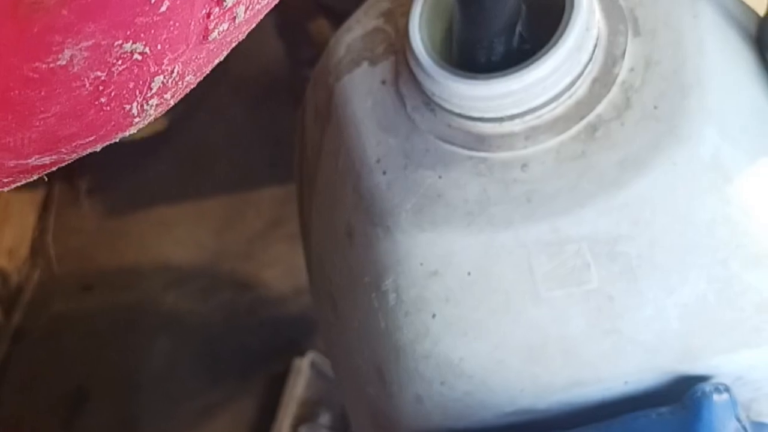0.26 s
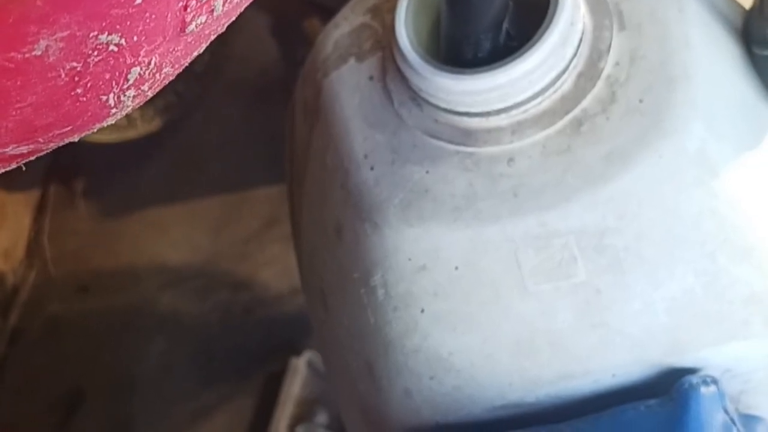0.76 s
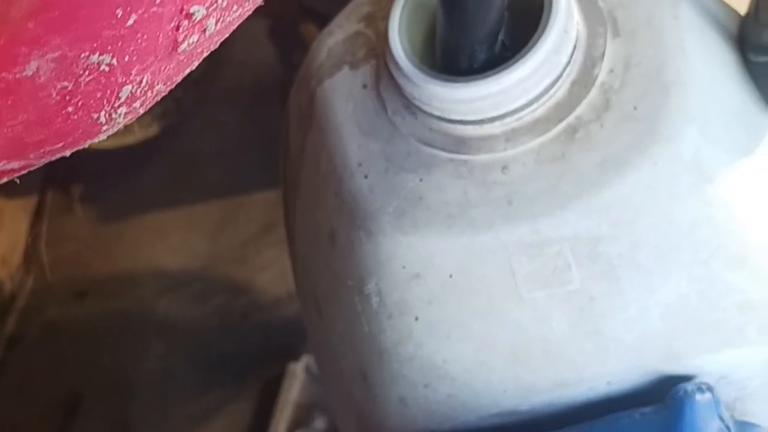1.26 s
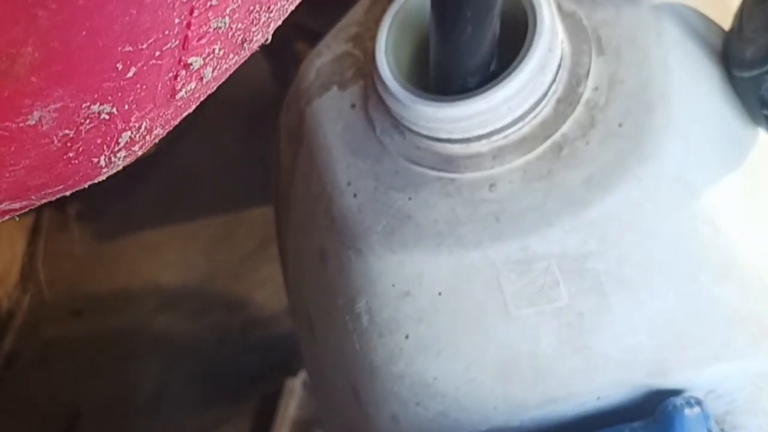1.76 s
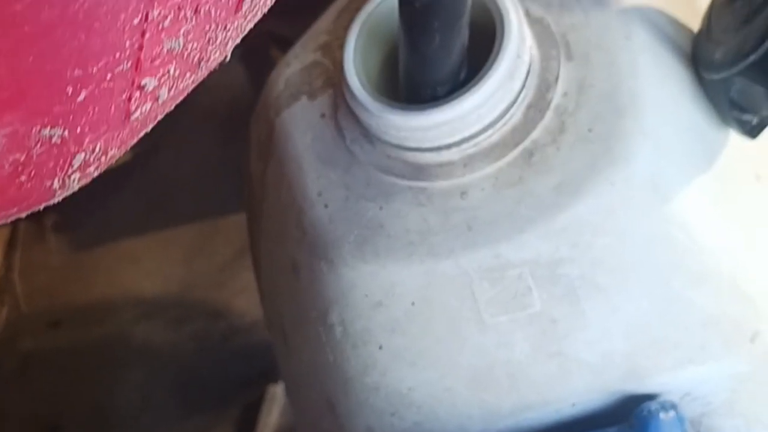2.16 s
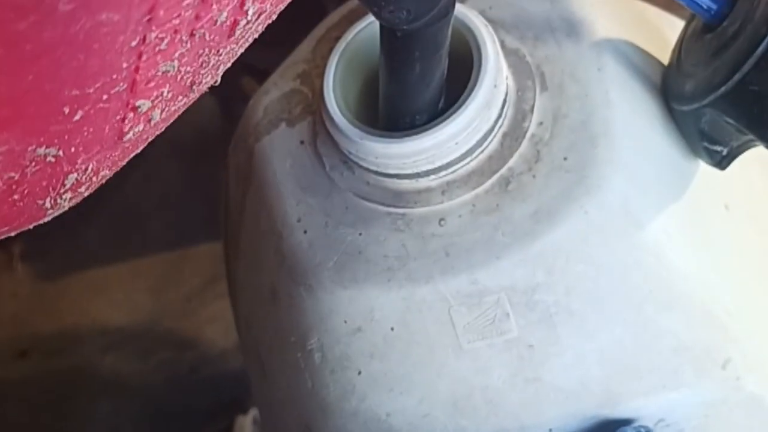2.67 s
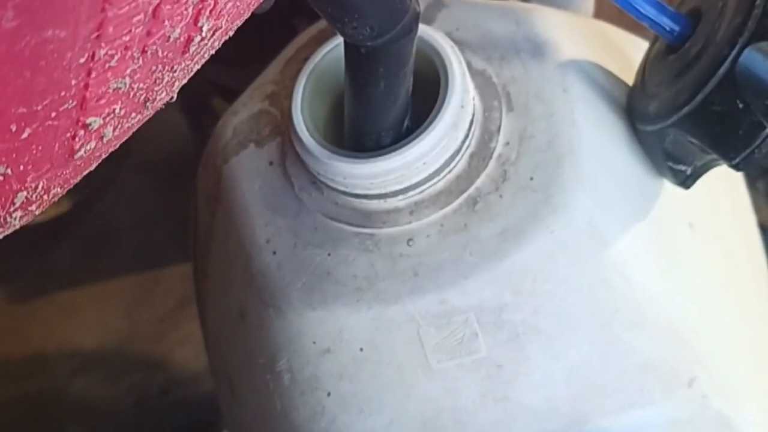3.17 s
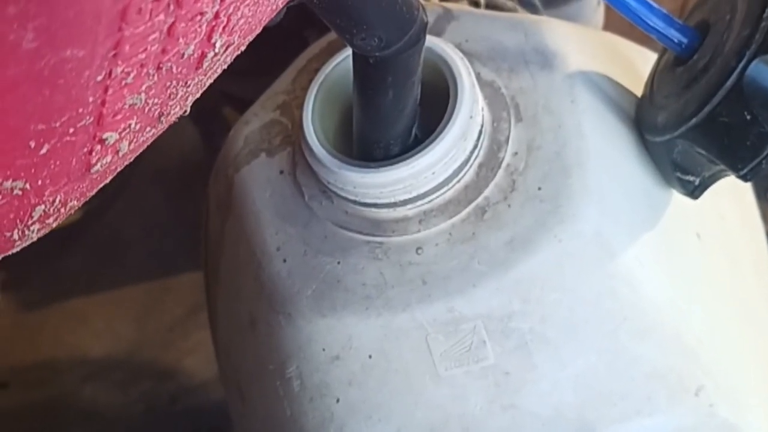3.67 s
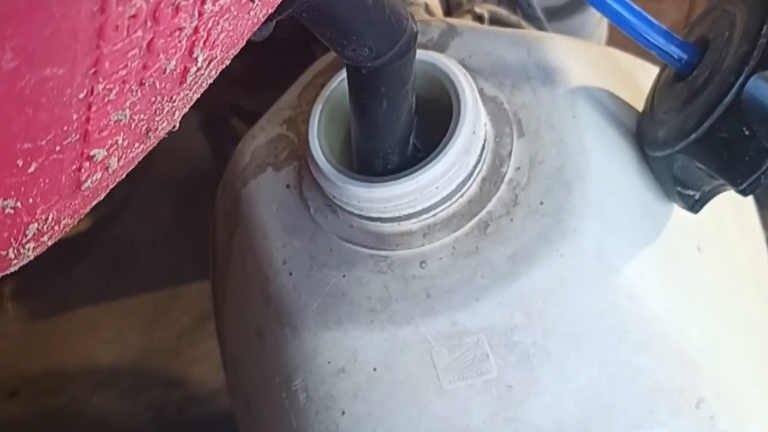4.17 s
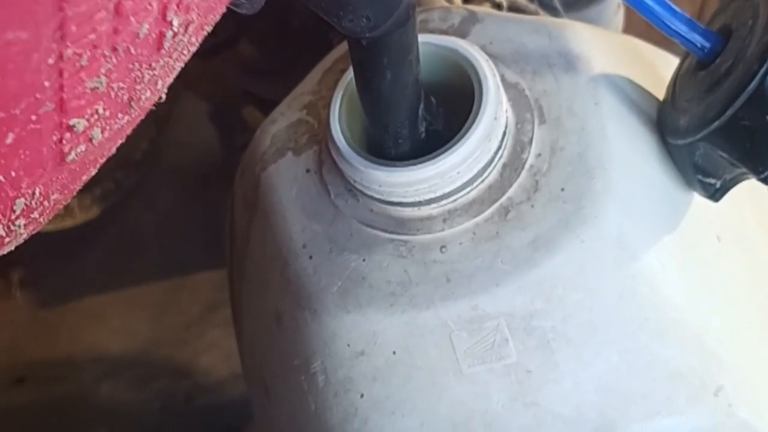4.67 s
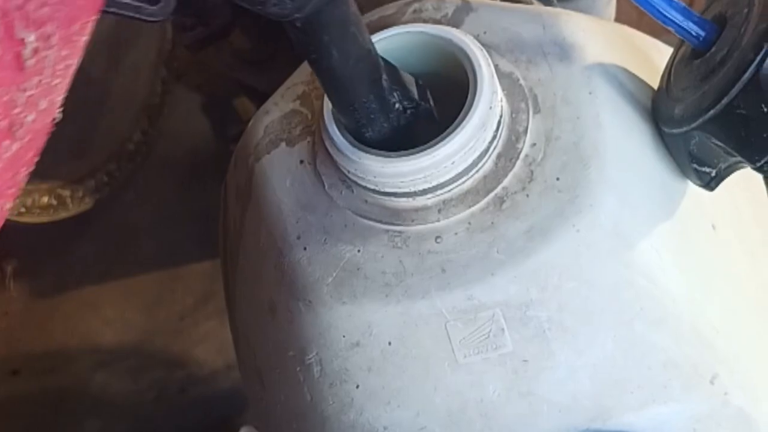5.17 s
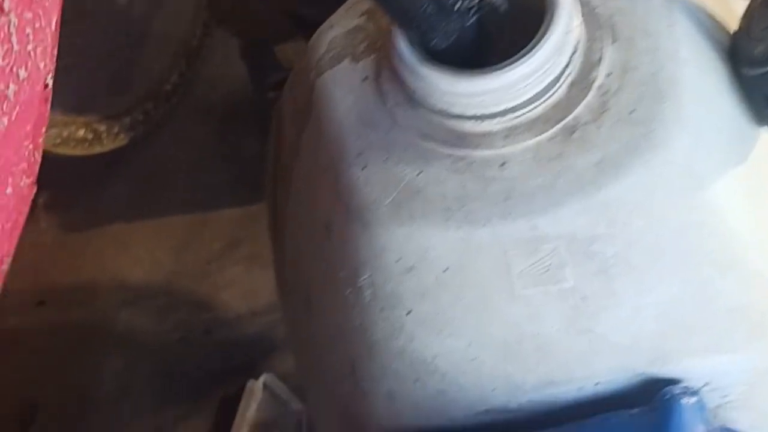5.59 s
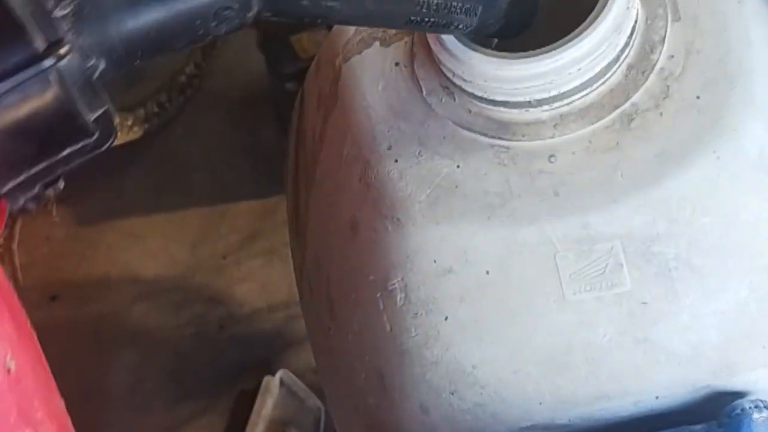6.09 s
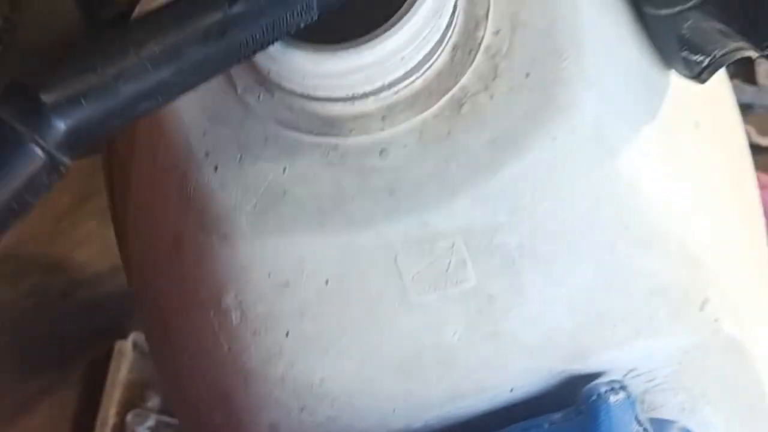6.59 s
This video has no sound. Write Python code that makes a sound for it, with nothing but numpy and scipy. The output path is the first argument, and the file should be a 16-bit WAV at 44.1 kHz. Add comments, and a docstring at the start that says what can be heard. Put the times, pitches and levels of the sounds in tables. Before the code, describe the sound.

Close bubbly pouring into a plastic fuel tank with plops and low gurgle, dying to drips, a scraping slide and soft microphone bumps.

```python
"""In a workshop, fuel runs from a plastic can's spout into a plastic motorcycle tank. Swarms of damped tones
make a fizz of tiny bubbles, plops and a gurgle, which ring in the hollow tank. The spout goes deeper into
the neck and the stream thins to drips; then the spout slides out with filtered noise and gliding squeaks.
A hand bumps the microphone's case with dull bursts of noise; wavering tones hum low behind it all."""
import sys
import numpy as np
from scipy import signal
from scipy.fft import rfft, irfft, next_fast_len
from scipy.io import wavfile
from scipy.ndimage import uniform_filter1d

SR = 44100
rng = np.random.default_rng(int(sys.argv[2]) if len(sys.argv) > 2 else 0)


def dump_mix(stems):
    """Bounce the given channels to the path in sys.argv[1] as a 16-bit WAV at rate SR."""
    frames = np.atleast_2d(stems).T  # one column per channel
    limited = np.clip(frames, -1, 1)  # hard clip at full scale
    pcm = np.round(limited * 32767).astype(np.int16)
    wavfile.write(sys.argv[1], SR, pcm)


N = 301637
T = np.arange(N) / SR
HZ = np.fft.rfftfreq(N, 1 / SR)

# tone colour of the finest bubbles: f/Hz, level/dB
FIZZ_COLOUR = [(1590, -2.5), (2700, -1.5), (3180, 0.5), (3720, 0.5), (5040, 0), (6350, 0.2), (7550, -3.5),
               (8300, -5.5), (9070, -7.5), (10800, -4), (12100, 1.8), (13500, 2.5), (15100, 4),
               (15900, -1.5)]
# how hard the jet plunges into the pool, less as the spout goes deeper: t/s, level/dB
PLUNGE_LEVEL = [(0, -4), (.7, -2), (1.18, 1), (1.65, -3), (2.15, -8.5), (3.65, -5.5), (3.92, -13.5),
                (4.44, -12), (4.72, -29), (5.05, -33), (5.25, -44)]
# the largest bubbles, plus one soft knock at 5.597 s voiced the same way: t/s, relative level/dB, pitch f/Hz
LARGE_BUBBLES = [(0.093, -26, 1290), (0.4657, -33, 1480), (0.847, -31, 1490), (0.8974, -30, 2060),
                 (0.9866, -28, 1830), (1.043, -22.5, 1630), (1.1558, -39, 1390), (1.2466, -22, 2120),
                 (1.286, -23, 1410), (1.734, -30, 1280), (1.8215, -30.5, 1080), (1.9404, -33, 1840),
                 (1.9874, -23.5, 1880), (2.3088, -27, 1700), (2.7033, -24, 1560), (2.7541, -28, 1250),
                 (2.8574, -42, 1550), (2.9213, -37, 1970), (3.0073, -24.5, 1560), (3.0935, -30, 1650),
                 (3.1872, -36, 1590), (3.3142, -20.5, 1590), (3.364, -20, 2370), (3.6074, -23.5, 1610),
                 (3.6656, -28, 2000), (3.7364, -44, 2020), (4.0948, -24.5, 2220), (4.214, -29, 1840),
                 (4.3134, -26, 1840), (4.6139, -31, 1850), (4.9, -31, 1430), (4.9641, -27, 1890),
                 (4.983, -37, 1400), (5.054, -35.5, 1370), (5.085, -37, 2200), (5.125, -35, 1130),
                 (5.2016, -38.5, 1500), (5.272, -45, 1500), (5.287, -39, 3300), (5.366, -46, 1110),
                 (5.447, -49, 1410), (5.52, -48.5, 1010), (5.597, -45, 1110)]


def amp(db):
    """Turns decibels into a gain."""
    return 10 ** (np.asarray(db) / 20)


def unit(x):
    """Scales a sound so that the mean of its channels has rms 1."""
    middle = np.atleast_2d(x).mean(0)
    return x / np.sqrt(np.mean(middle ** 2) + 1e-20)


def curve(rows):
    """Joins (time, value) rows by straight lines, giving a value at every sample."""
    return np.interp(T, *np.transpose(rows))


def swell(start, length, edge):
    """A gain that rises over edge seconds, holds from start for length seconds, and dies away alike."""
    outside = np.maximum(np.maximum(start - T, T - start - length), 0)
    return np.exp(-(outside / edge) ** 2)


def shape(points):
    """Gain at every frequency from (Hz, dB) points."""
    f, db = np.transpose(points)
    return amp(np.interp(np.log(HZ + 1), np.log(f + 1), db))


def colour(x, gain):
    """Filters a sound by a gain given at every frequency."""
    size = next_fast_len(N + 4096)
    gain = np.interp(np.fft.rfftfreq(size, 1 / SR), HZ, gain)
    return irfft(rfft(x, size) * gain, size)[..., :N]


def wander(rate):
    """A random curve of rms 1 that takes a new direction rate times a second."""
    knots = rng.standard_normal(4096)
    return unit(np.interp(T * rate, np.arange(len(knots)), knots))


def add(mix, s, sound):
    """Mixes a sound in at time s."""
    part = mix[max(round(s * SR), 0):][:len(sound)]
    part += sound[:len(part)]


def resonate(x, hz, width):
    """A resonance of gain 1 that may follow a pitch curve."""
    # shift the pitch down to 0 Hz, smooth there, and shift back
    turn = np.exp(2j * np.pi * np.cumsum(hz * np.ones(N)) / SR)
    r = np.exp(-np.pi * abs(width) / SR)
    return 2 * (turn * signal.lfilter([1 - r], [1, -r], x / turn)).real


def bubble(hz, cycles, rise):
    """A damped ring with a soft start; its pitch climbs as the bubble nears the surface."""
    u = np.arange(0, 5, hz / cycles / SR)  # time, counted in decay times
    ring = np.sin(2 * np.pi * cycles * (u + rise * u ** 2 / 2))
    return (1 - np.exp(-u / 0.097)) * np.exp(-u) * ring


def swarm(lo_hz, hi_hz, per_s, spread_db, cycles, rise, pitches=36):
    """Many bubbles at random moments and of random strength, on evenly spaced pitches."""
    out = np.zeros(N)
    for hz in np.linspace(lo_hz, hi_hz, pitches):
        when, luck, keep = rng.random((1500, 3)).T
        kept = keep < per_s * T[-1] / pitches / len(keep)
        strength = amp(spread_db * np.minimum(-np.log(luck + 1e-9), 4.5)) * kept
        starts = np.bincount((when * N).astype(int), strength, N)
        ring = bubble(hz, cycles, rise)
        out += signal.oaconvolve(starts, ring / np.linalg.norm(ring))[:N]
    return out


def cavity(x, t60, direct, late=6, patterns=5, smooth=60):
    """Sound leaves the neck directly, late samples later at the right port, then as dense wall echoes.
    The echoes keep changing as the surface heaves, so several patterns take turns."""
    t, out = T[:6144], np.zeros((2, N))
    heave = T * 13 + .6 * wander(rate=3)
    for k in range(patterns):
        response = rng.standard_normal((2, len(t))) * amp(-60 * t / t60)
        response /= np.linalg.norm(response, axis=1, keepdims=True)
        response[0, 0] += direct
        response[1, late] += direct
        # the echoes ripple the spectrum finely but leave its broad outline even
        z = rfft(response, 2 * len(t))
        outline = np.sqrt(uniform_filter1d(abs(z) ** 2, size=smooth, axis=1))
        response = irfft(z / outline)[:, :len(t)]
        share = np.sin(np.pi / 2 * np.minimum((heave - k) % patterns, 2))
        out += signal.oaconvolve((x * share)[None], response, axes=1)[:, :N]
    return out


def stream():
    """The jet breaks into fizz and drags air under: small bubbles tinkle, large ones gurgle."""
    # the flow is steady until the can is tipped back, then chokes and dribbles: t/s, level/dB
    flow_db = curve([(0, 1), (4.68, 1), (4.70, -5), (4.715, 1), (5.145, -0.5), (5.165, -5), (5.205, -6.5),
                     (5.225, -9), (5.255, -7), (5.29, -3.5), (5.315, -7.5), (5.342, -2), (5.365, -8),
                     (5.4, -15), (5.48, -11), (5.55, -26), (5.585, -9.5), (5.8, -20)])
    open_neck = np.interp(T, [2.1, 2.5], [1, 0])  # until the spout fills the neck
    running = np.interp(T, [5.6, 5.95], [1, 0])
    fizz = fine_fizz(flow_db)
    # with the neck open, the top of the fizz leans to the left port
    beam = colour(fizz, shape([(7500, -11.5), (8800, 0.0), (12500, 0.5), (14000, -9)])) * open_neck
    # and the gap around the spout rings in one broad band
    gap = colour(fizz[0], shape([(3000, -12.5), (3650, 0.0), (4200, -4.0), (4900, -46)])) * open_neck
    # the level dips briefly around each of the largest bubbles, most for the strongest
    loudest_db = max(db for s, db, hz in LARGE_BUBBLES)
    dips = [amp(db - loudest_db) * swell(s, 0.026, edge=0.033) for s, db, hz in LARGE_BUBBLES]
    dip_db = -2.5 * np.max(dips, axis=0)
    pour = fizz + beam * np.array([[.35], [-.45]]) + gap * np.array([[.15], [.7]])
    return running * (pour + small_bubbles(flow_db + dip_db) + gurgle(0.1 * dip_db))


def fine_fizz(flow_db):
    """The jet breaks up into tiny, high, quickly damped bubbles that come in spurts."""
    spurts = wander(rate=46)
    spray = swarm(2940, 13350, per_s=3800, spread_db=2.5, cycles=0.74, rise=0.065)
    spray = cavity(spray * amp(.7 * spurts), t60=.045, direct=.45, patterns=8, smooth=16)
    return unit(colour(spray, shape(FIZZ_COLOUR))) * amp(-55 + flow_db)


def small_bubbles(change_db):
    """Air dragged under in gulps tinkles as small ringing bubbles."""
    # tone colour: f/Hz, level/dB
    bubbling_colour = [(500, 6.5), (850, -1), (1060, -4), (1300, 2.5), (1650, 0), (1900, 2), (2250, -2.5),
                       (2800, 2), (3640, -19), (6160, -120)]
    # level before the given change: t/s, level/dB
    bubbling_level = [(0, -64), (.75, -65), (1.0, -58), (1.35, -60), (1.85, -60.5), (2.2, -65.5),
                      (2.75, -61), (3.15, -63), (3.7, -60), (3.92, -65), (4.45, -59.5), (4.75, -68.5),
                      (5.13, -72.5), (5.19, -73)]
    small = swarm(700, 3100, per_s=1300, spread_db=2.8, cycles=2.2, rise=.04)
    small = cavity(small * gulps(), t60=.05, direct=.6, smooth=30)
    return unit(colour(small, shape(bubbling_colour))) * amp(curve(bubbling_level) + change_db)


def gulps():
    """Air goes under in gulps: a gain of rms 1 that leaps at random moments and sinks back."""
    per_s, fade_s, depth = 60, .010, .35
    when, size = rng.random((2, N))
    leaps = 2 * size * (when < per_s / SR)
    rush = signal.lfilter([1], [1, -np.exp(-1 / (fade_s * SR))], leaps)
    return unit(1 - depth + depth * np.sqrt(rush))


def gurgle(change_db):
    """Large, low bubbles gurgle more strongly the harder the jet plunges."""
    # tone colour: f/Hz, level/dB
    gurgle_colour = [(82, -31), (140, -14), (166, -7.5), (254, -3.5), (307, -6), (430, 2), (476, -2),
                     (547, 0), (607, -0.5), (690, 2.5), (835, -5.5), (910, -10.5), (1100, -3.5),
                     (1430, -47), (2420, -120)]
    large = swarm(205.5, 952, per_s=1100, spread_db=1.5, cycles=1.35, rise=0.016)
    low = cavity(large, t60=0.11, direct=0.24)
    # long waves reach both ports alike
    low = low + colour(low[::-1], shape([(250, 0.5), (430, -8.0), (560, -28), (700, -59)]))
    return unit(colour(low, shape(gurgle_colour))) * amp(-51.5 + curve(PLUNGE_LEVEL) + change_db)


def drips():
    """Big bubbles plop; drops splash on the wall and neck and trap a tiny ringing bubble."""
    # drops at set times: t/s, relative level/dB, ring f/Hz, share of ring against splash (0-1)
    set_drops = [(0.2947, -40, 13100, 0.6), (0.6413, -35.5, 6200, 0.4), (0.7916, -45, 4330, 0.6),
                 (1.254, -35.5, 6450, 0.54), (1.3024, -40, 14200, 0.9), (1.5534, -38, 13500, 0.7),
                 (2.279, -35.5, 4310, 0.5), (2.561, -39, 12500, 0.9), (2.835, -33.5, 6600, 0.57),
                 (2.9198, -44, 6130, 0.7), (3.3867, -38, 13000, 0.4), (3.716, -44, 6420, 0.43),
                 (4.1026, -42, 14700, 0.8), (4.36, -36.5, 6200, 0.4), (4.4844, -32, 13300, 0.5),
                 (4.569, -40.5, 5570, 0.8), (4.713, -38, 13500, 0.1), (4.8005, -40, 13300, 0.4),
                 (4.8516, -35, 13200, 0.6), (5.1114, -35.5, 6940, 0.53), (5.1336, -37.5, 14540, 0.3),
                 (5.217, -35.5, 5260, 0.42), (5.4228, -54, 6200, 0.8), (5.445, -45.5, 7450, 1),
                 (5.472, -45, 7600, 0.6), (5.5607, -47, 14560, 0.25), (5.624, -46, 13000, 0.2),
                 (5.658, -48, 5200, 0.34), (5.701, -50.5, 5660, 1), (5.7366, -48.5, 14200, 0.3),
                 (5.783, -51, 9000, 0.3), (5.8074, -49, 12800, .5), (5.8356, -44.5, 12800, 0.34)]
    plops, drops, t = np.zeros(N), np.zeros(N), T[:2000]
    for s, db, hz in LARGE_BUBBLES:
        add(plops, s, amp(db) * plop(hz))
    for s, db, hz, ring in set_drops + spatter():
        splash = (1 - ring) * rng.standard_normal(len(t)) * np.exp(-t / 0.0038) * 0.75
        add(drops, s, amp(db) * splash)
        add(drops, s, amp(db) * 3 * ring * bubble(hz, cycles=3.0, rise=0.0083))
    drops = colour(drops, shape([(1200, -70), (4500, -1.5), (7000, -4.0), (9500, -4.5), (13000, 2.0)]))
    plops = cavity(plops, t60=.06, direct=.6)
    drops = cavity(drops, t60=.065, direct=.33)
    return amp(-12.5) * plops + amp(4.4) * drops


def plop(hz):
    """A large bubble rings and sheds six smaller, quieter ones just after, pitched around it."""
    out = np.zeros(2000)
    add(out, 0, bubble(hz, cycles=2, rise=.02))
    for delay, pitch in rng.random((6, 2)):
        shed_hz = hz * 2 ** (1.6 * pitch - .8)
        add(out, .014 * delay, .45 * bubble(shed_hz, cycles=1.3, rise=.03))
    return out


def spatter():
    """More drops, all of one middling level, fall at random while the fuel runs."""
    end_s, per_s, relative_db, ring_share = 5.1, 1.9, -40.5, .4
    # each row: t/s, relative level/dB, ring f/Hz, share of ring (0-1)
    return [(when * end_s, relative_db, np.interp(pitch, [0, 1], (5000, 14700)), ring_share)
            for when, pitch, keep in rng.random((64, 3)) if keep < per_s * end_s / 64]


def headspace(x):
    """Standing waves above the pool lift some notes and hollow out others, wavering as the surface heaves."""
    # waves and hollows: f/Hz, width/Hz, level/dB with the spout deep, level/dB with the can tipped back
    standing_waves = [(730, 35, 2, 5), (830, 70, 3.5, 2), (1065, 220, -8, -1), (1230, 31, 2, 8),
                      (1670, 61, 2, 0), (1881, 16, 6, 10), (2000, 24, 6, 10), (2210, 17, 9, 7),
                      (2336, 100, -9, -16), (2452, 27, 9.5, 6), (2730, 420, -15, -6), (3000, 37, 8, -10),
                      (3240, 240, -4.5, -4.5), (3600, 83, 3.5, -2.5), (4060, 100, -6.5, 0),
                      (4370, 110, 0, 0), (5330, 170, -6, -3), (6240, 310, 2.5, 0.5)]
    # how fully those levels apply: t/s, share (0-1)
    ringing = curve([(0, 0.33), (1.6, .35), (2.3, 0.91), (3.1, 0.53), (4.1, 1), (5.0, 1), (5.25, .45)])
    heave_db, heave_detune, heave_per_s = 2, .004, 4.5
    tipped = np.interp(T, [4.35, 4.77], [0, 1])  # the can is tipped back
    for hz, width, deep_db, tipped_db in standing_waves:
        lift_db = ringing * (deep_db + tipped * (tipped_db - deep_db))
        lift_db = lift_db + heave_db * wander(rate=heave_per_s)
        wavering_hz = hz * (1 + heave_detune * wander(rate=heave_per_s))
        x = x + (amp(lift_db) - 1) * resonate(x, wavering_hz, width)
    return x


def tank_air():
    """The air in the tank booms at the neck's note and sings in its higher modes; the fuel sloshes below."""
    return neck_boom() + tank_modes() + slosh()


def neck_boom():
    """The neck's low note, a tone plus resonating noise, sinks as the spout narrows the neck."""
    # level before surges and throbbing: t/s, level/dB
    boom_level = [(0, -49), (1.5, -48.5), (3.76, -49.5), (3.87, -54), (5.85, -54), (6.4, -57), (6.75, -53)]
    # brief swells: t/s at the top, length/s, rise/dB
    surges = [(1.11, 0.053, 7), (1.254, 0.13, 8), (1.858, 0.19, 7.5), (3.357, 0.11, 3.5)]
    hz = np.interp(T, [0, 3.0], [101.3, 92.7])
    surge_db = sum(db * np.exp(-(2 * (T - s) / length) ** 2) for s, length, db in surges)
    # it throbs while the jet plunges hard
    throb_db = amp(0.27 * curve(PLUNGE_LEVEL)) * wander(rate=14)
    churn = np.interp(T, [3.6, 4.1], [.22, .1])
    stirred = unit(resonate(resonate(rng.standard_normal(N), hz, 45), hz, 52))
    boom = unit(np.sin(2 * np.pi * np.cumsum(hz) / SR)) + churn * stirred
    return boom * amp(curve(boom_level) + surge_db + throb_db)


def tank_modes():
    """Each air mode holds its note while its phase and strength waver at random."""
    # air modes of the tank: f/Hz, width/Hz, relative level/dB
    air_modes = [(430, 4.5, -3.5), (517, 20, -9), (666, 16, -36), (780, 12, -46)]
    modes = np.zeros(N)
    for hz, width, db in air_modes:
        phase = 2 * np.pi * hz * T + 0.75 * wander(rate=2 * width)
        modes += amp(db + wander(rate=16)) * np.sin(phase)
    # the singing changes by 3.4 dB for each dB of plunge
    singing = amp(-61.5 + 3.4 * curve(PLUNGE_LEVEL))
    # for a moment the jet drums on the pool
    drumming = amp(-55) * swell(1.12, 0.37, edge=0.14)
    return unit(modes) * (singing + drumming)


def slosh():
    """The moving fuel is a low rumble of noise, partly shared by both ports, that calms towards a rest level."""
    # tone colour: f/Hz, level/dB
    rumble_colour = [(15, -7), (30, -57), (48, 2.5), (66, 8), (82, -0.5), (110, 0), (130, 1), (160, -14.5),
                     (230, -14.5), (400, -36.5)]
    start_db, calms_db_per_s, rest_db = -48, 2.5, -68
    waves = rng.standard_normal((2, N))
    level = np.hypot(amp(start_db - calms_db_per_s * T), amp(rest_db))
    return unit(colour(waves + 0.47 * waves[::-1], shape(rumble_colour))) * level


def final_ticks():
    """At the very end, from 6.7 s, faint scattered ticks of tiny bubbles."""
    start_s, start_db, fade_db_per_s = 6.7, -69, 7
    ticks = swarm(4000, 15500, per_s=130, spread_db=2.5, cycles=1, rise=.05, pitches=8)
    ticks = cavity(ticks, t60=.04, direct=.6, patterns=3, smooth=16)
    age = T - start_s
    level = (age > 0) * amp(start_db - fade_db_per_s * np.maximum(age, 0))
    return unit(colour(ticks, shape(FIZZ_COLOUR))) * level


def spout():
    """The wet spout slides out with a hollow rub, dry scrapes, the neck's note and thin gliding squeaks."""
    return rubbing() + scraping() + neck_note() * amp([[-8], [2]]) + squeaking() * amp([[-5], [-2]])


def rubbing():
    """The spout's rub on the neck is coloured noise with a quick random flicker in level."""
    # tone colour: f/Hz, level/dB
    rub_colour = [(200, 7.5), (420, -8), (600, 1), (740, 7), (830, 9.5), (960, 2.5), (1200, 1),
                  (1450, -5.5), (1820, -9.5), (2300, -2), (2700, -14), (3100, -12), (4500, -6),
                  (6300, -2.5), (9000, -22), (13000, -12), (16000, 0.5)]
    # how hard it rubs; it rests twice on the way out: t/s, level/dB
    rub_level = [(5.65, -81), (5.75, -65.5), (5.8, -67.5), (5.87, -57), (6.22, -56.5), (6.3, -66),
                 (6.395, -82), (6.445, -64), (6.52, -74), (6.62, -77), (6.68, -65.5), (6.8, -65.5)]
    rub = unit(colour(rng.standard_normal((2, N)), shape(rub_colour)))
    rub = amp(curve(rub_level) + wander(rate=150)) * rub
    # the neck's hollow note favours the right port
    rub[0] = colour(rub[0], shape([(500, -1.0), (830, -12), (1300, 5.5), (3000, 0.0), (7000, -3.0)]))
    return rub


def scraping():
    """The spout scrapes over the rim in short bursts of bright noise."""
    # scrapes: t/s, length/s, level/dB
    scrapes = [(5.917, 0.092, -74), (6.186, 0.052, -61), (6.313, 0.027, -71)]
    level = sum(amp(db) * swell(s, length, edge=0.012) for s, length, db in scrapes)
    bright = shape([(3000, -13.5), (6000, -10), (9000, -17), (13000, -1), (16000, -15)])
    return level * unit(colour(rng.standard_normal((2, N)), bright))


def neck_note():
    """The neck's hollow note, noise through two equal resonances, sounds through the first part of the slide."""
    hz, width_hz, relative_db = 827, 34, -71.5
    note = resonate(resonate(rng.standard_normal(N), hz, width_hz), hz, width_hz)
    return unit(note) * amp(relative_db) * swell(5.65, 0.59, edge=0.044)


def squeaking():
    """The spout slips on the rim in short squeaks: gliding tones with jittery pitch and fluttering level."""
    # squeaks: t/s, length/s, first f/Hz, last f/Hz, relative level/dB
    squeaks = [(5.79, .045, 11600, 12500, -70), (5.865, .05, 13200, 14400, -66),
               (5.912, .125, 6500, 7120, -59.5), (5.965, .05, 13650, 13950, -61),
               (6.02, .05, 14250, 14350, -66), (5.98, .05, 15400, 15800, -63),
               (6.095, .04, 14400, 14950, -66), (6.04, .11, 7120, 7650, -70),
               (6.155, .062, 14500, 13500, -61.5), (6.16, .1, 7650, 6500, -66)]
    jitter, flutter_db = .004, 2.5
    out = np.zeros(N)
    for s, length, first_hz, last_hz, db in squeaks:
        glide_hz = np.interp(T, [s, s + length], [first_hz, last_hz])
        hz = glide_hz * (1 + jitter * wander(rate=590))
        out += amp(db) * swell(s, length, edge=.008) * np.sin(2 * np.pi * np.cumsum(hz) / SR)
    return out * amp(flutter_db * wander(rate=70))


def handling():
    """The grip shifts: dull knocks and dry scuffs travel through the case, mostly into the right port."""
    # bumps: t/s, relative thud level/dB, thud brightness f/Hz, relative scuff level/dB, decay time/s
    bumps = [(2.353, -46, 908, -42.5, 0.043), (2.369, -33.5, 1390, -35.5, 0.0084),
             (2.376, -40, 895, -30.5, 0.0016), (2.3794, -22, 900, -21, 0.001),
             (5.597, -56, 497, -75, 0.033), (6.033, -44, 620, -73, 0.014), (6.058, -50, 420, -75, 0.028),
             (6.43, -63, 300, -65, 0.3), (6.667, -49.5, 181, -62, 0.064), (6.743, -49, 264, -70, 0.28),
             (6.782, -36, 300, -55, 0.018), (6.802, -36, 493, -61, 0.023)]
    # tone colour of the thuds: f/Hz, level/dB
    thud_colour = [(30, -6), (90, 3), (150, -0.5), (255, -3.5), (340, -6), (450, -1.5), (600, -11),
                   (780, -4), (1100, -18.5), (3000, -2), (8000, -21)]
    thuds, scuffs = np.zeros((2, N)), np.zeros(N)
    for s, thud_db, bright_hz, scuff_db, decay in bumps:
        age = np.maximum(T - s, 0)
        contact = (1 - np.exp(-age / 0.0013)) * np.exp(-age / decay)
        soft = signal.butter(2, np.clip(bright_hz, 50, 8000), fs=SR)
        thuds += amp(thud_db) * contact * unit(signal.lfilter(*soft, rng.standard_normal((2, N))))
        scuffs += amp(scuff_db) * contact
    thud = colour(thuds + 0.4 * thuds[::-1], shape(thud_colour)) + case_rings()
    dry_colour = shape([(500, -21), (3000, -8.0), (6200, 3.5), (9000, -11.0), (13000, 4.0)])
    scuff = colour(scuffs * rng.standard_normal((2, N)), dry_colour)
    return thud * amp([[-5], [0]]) + scuff * amp([[-11], [5]])


def case_rings():
    """Each firm knock rings the case briefly at a low note."""
    # knocks: t/s, relative level/dB, ring f/Hz, decay time/s
    knocks = [(2.3718, -33, 400, .0016), (2.372, -40, 185, .009), (6.037, -42, 252, .028),
              (6.781, -27, 150, .011), (6.7825, -31, 238, .016), (6.831, -37, 170, .012)]
    out = np.zeros(N)
    for s, db, hz, decay in knocks:
        add(out, s, amp(db) * bubble(hz, cycles=hz * decay, rise=0))
    return out


def workshop():
    """Still air is soft coloured noise; a faint hum of steady notes wavers in level and phase."""
    # hum notes: f/Hz, level/dB
    hum_notes = [(134.6, -72), (204.6, -85.5), (419.9, -78)]
    # tone colour of the air: f/Hz, level/dB
    air_colour = [(60, 9.5), (150, 5.5), (250, 1), (420, 1), (600, -12.5), (900, -19), (1500, -21),
                  (2700, -39), (4500, -8.5), (6000, -10.5), (9000, -19), (13000, -6.5), (16000, -19)]
    hum = np.zeros(N)
    for hz, db in hum_notes:
        tone = np.sin(2 * np.pi * hz * T + 0.72 * wander(rate=8.6))
        hum += amp(db + 2 * wander(rate=3.66)) * unit(tone)
    air = rng.standard_normal((2, N))
    # the low part is shared by both ports
    air = air + colour(air[::-1], shape([(400, -2.5), (800, -65)]))
    return hum + amp(-63.0) * unit(colour(air, shape(air_colour)))


def scene():
    """Sound from the neck reaches two ports that each favour their own bands; the rest is added to it."""
    # left minus right for sound from the tank's neck: f/Hz, level difference/dB
    lean = shape([(300, -1.5), (480, 0), (640, 4), (840, -5), (1050, 0.5), (1330, 12.5), (2000, -6.5),
                  (2450, 4.5), (3200, 0), (5000, 1.5), (6300, -5.5), (7600, 13), (8500, 9), (9500, 1),
                  (12500, 2.5), (14500, 0.5)])
    pouring = headspace(stream() + drips()) + tank_air() + final_ticks()
    right = np.sqrt(2 / (1 + lean ** 2))  # keeps the power of both ports together
    pouring = np.array([colour(pouring[0], lean * right), colour(pouring[1], right)])
    return pouring + spout() + handling() + workshop()


def record(dry):
    """A steep low-pass filter ends the treble near 16 kHz."""
    low_pass = signal.firwin(511, 15950, window=("kaiser", 9), fs=SR)
    return signal.oaconvolve(dry, low_pass[None], "same")


dry = scene()
out = record(dry)
dump_mix(out)
```